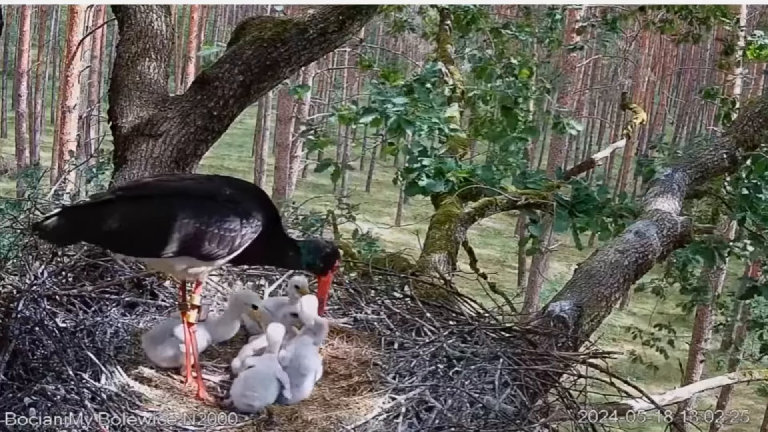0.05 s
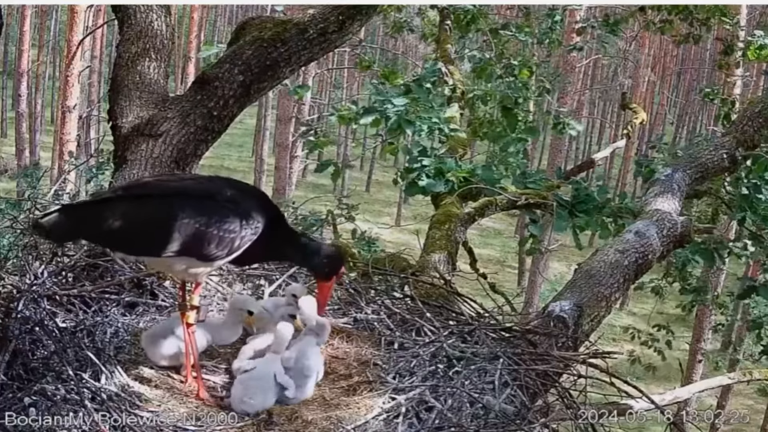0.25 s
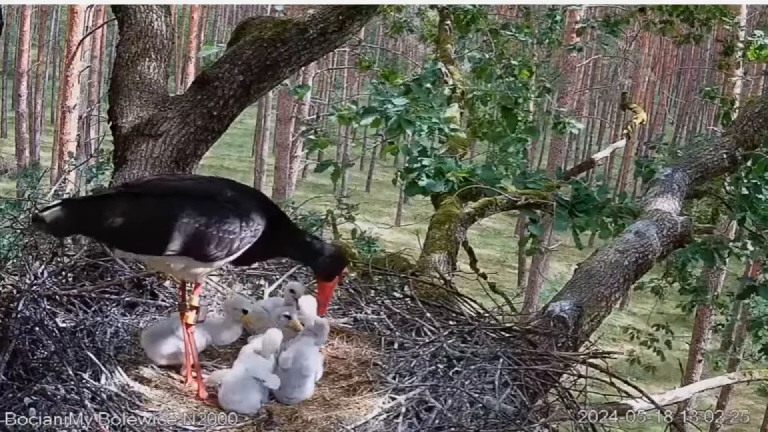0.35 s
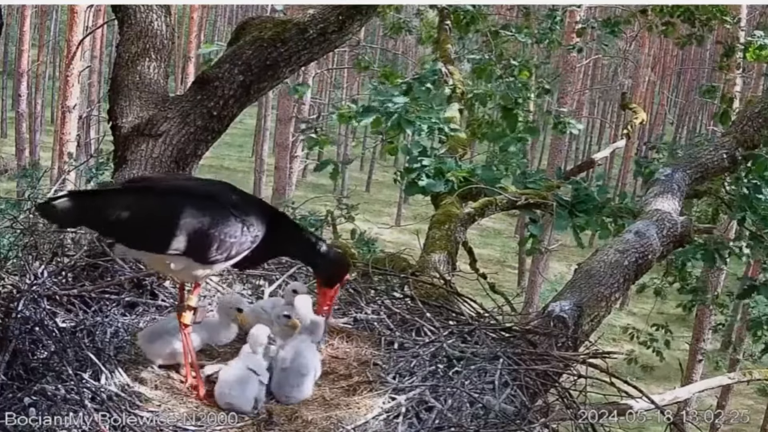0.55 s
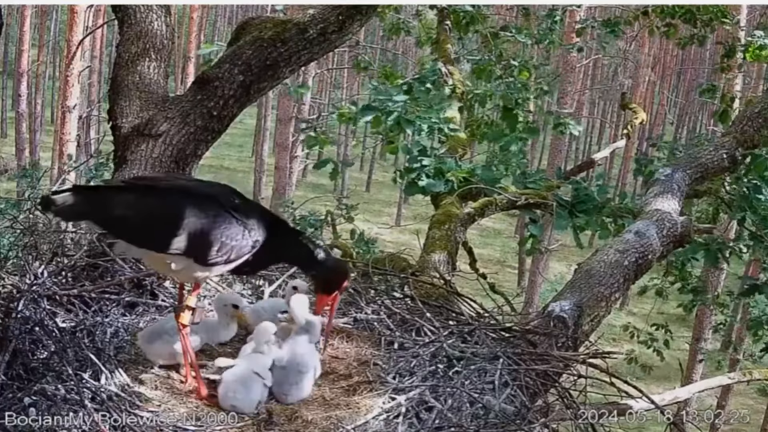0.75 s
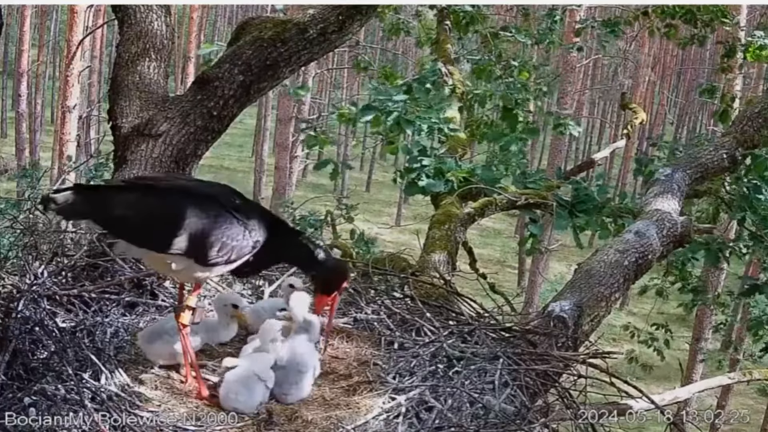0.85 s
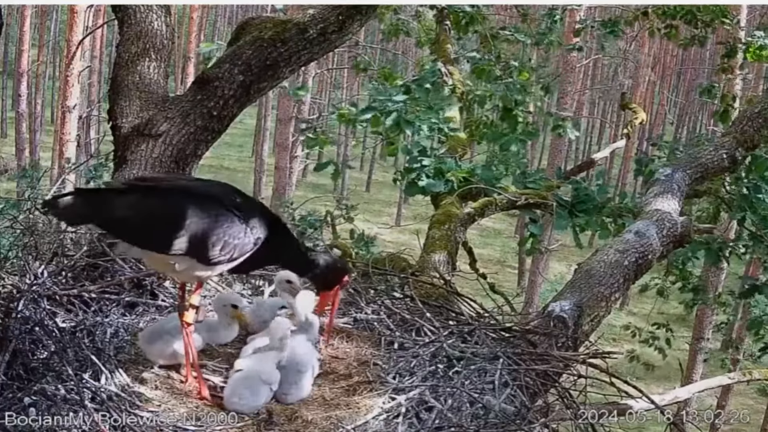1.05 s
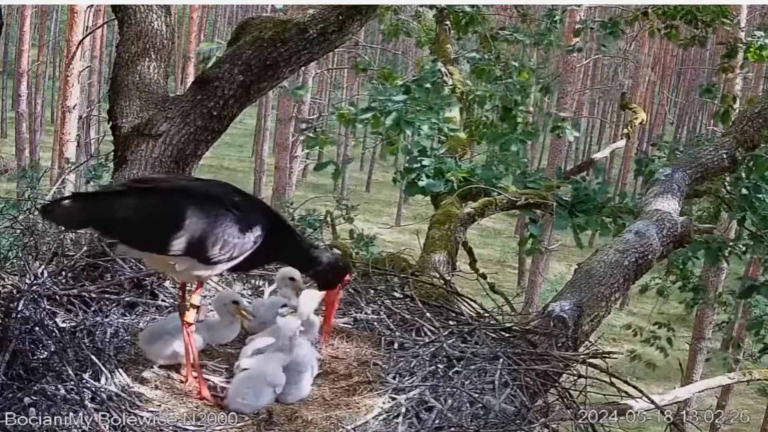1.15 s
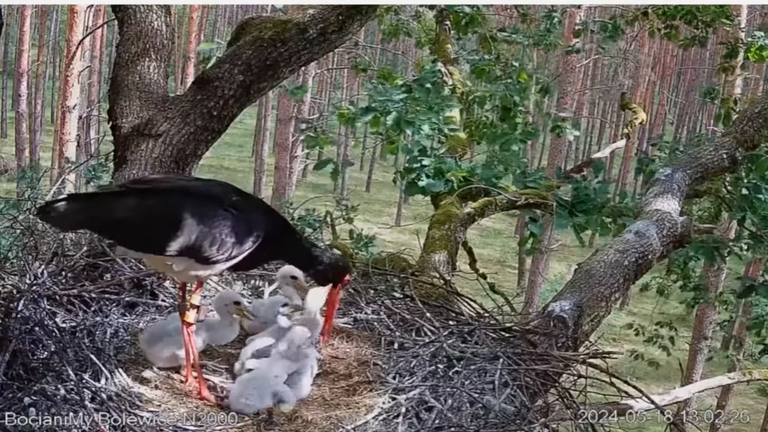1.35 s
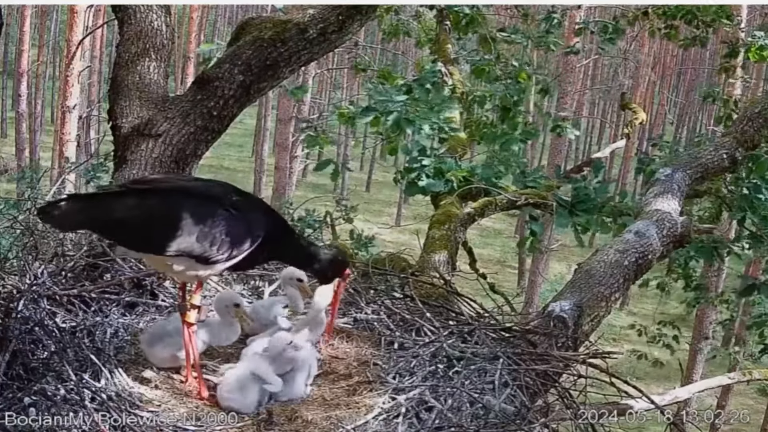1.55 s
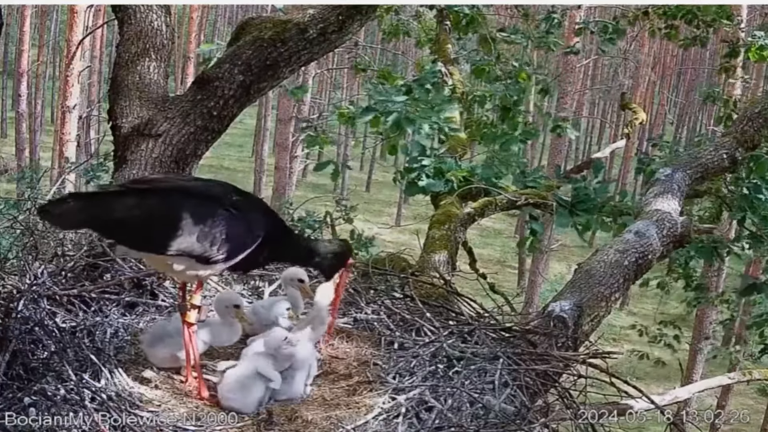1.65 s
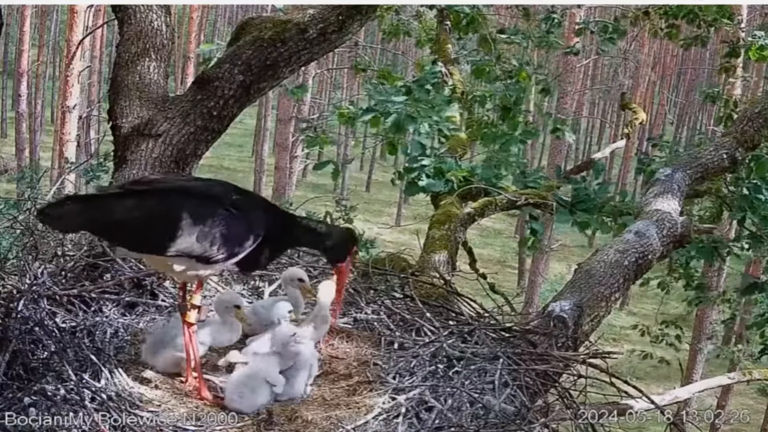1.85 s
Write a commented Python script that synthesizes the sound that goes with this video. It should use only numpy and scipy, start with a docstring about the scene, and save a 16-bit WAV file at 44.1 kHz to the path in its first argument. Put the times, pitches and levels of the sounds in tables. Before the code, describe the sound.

Stork chicks beg in a treetop forest nest, flipping between pulsing croaks, high arching whistles and hoarse rasps. After a short lull they call again, while low buffeting swells on the microphone. Twigs rustle faintly and bills tap.

```python
"""A treetop nest in a forest: stork chicks beg in two bouts. Their voices flip between a low, pulsing
croak and a high arching whistle, both fluttered by the syrinx, with hoarse rasps between. The open bill
colours the overtones. Twigs rustle, bills tap, and a short throat creak ends the scene.
Low buffeting swells under the second bout, and the forest gives a faint tail."""
import sys
import numpy as np
from scipy import signal
from scipy.fft import rfft, irfft, next_fast_len
from scipy.io import wavfile
from scipy.ndimage import uniform_filter1d

SR = 44100
rng = np.random.default_rng(int(sys.argv[2]) if len(sys.argv) > 2 else 0)


def put_to_file(sound):
    """Save the sound as 16-bit audio at rate SR, in the file named by the first command-line argument."""
    columns = np.atleast_2d(sound).T  # one column per channel
    safe = np.clip(columns, -1, 1)
    whole_steps = np.round(safe * 32767)
    wavfile.write(sys.argv[1], SR, whole_steps.astype(np.int16))


N = 83790
T = np.arange(N) / SR
WHISTLE_PULSE_HZ, CROAK_PULSE_HZ, BUZZ_HZ = 170, 107.9, 397
# throat passband: freq_hz, gain_db
THROAT_BAND = [(600, -16.5), (920, -18.5), (1150, -2), (3500, -1), (3850, -4), (4200, -14), (6000, -29)]


def amp(db):
    """Decibels to gain."""
    return 10 ** (np.asarray(db) / 20)


def unit(x):
    """Scale to rms 1."""
    return x / np.sqrt(np.mean(x ** 2) + 1e-20)


def colour(x, points):
    """Filter by a curve of freq_hz, gain_db."""
    hz, db = np.transpose(points)
    size = next_fast_len(N + 4096)
    bin_hz = np.maximum(np.arange(size // 2 + 1) * SR / size, 1)
    gain_db = np.interp(np.log(bin_hz), np.log(np.maximum(hz, 1)), db)
    return irfft(rfft(x, size) * amp(gain_db), size)[:N]


def noise(points):
    """Coloured noise, rms 1."""
    return unit(colour(rng.standard_normal(N), points))


def drift(rate_hz):
    """Smooth random wander, rms 1."""
    return unit(signal.sosfilt(signal.butter(2, rate_hz, fs=SR, output="sos"), rng.standard_normal(N)))


def curve(rows):
    """Straight lines through rows of time_s, value."""
    time_s, value = np.transpose(sorted(map(tuple, rows)))
    return np.interp(T, time_s, value)


def envelope(rows, edge_s=.002):
    """Gain from rows of time_s, level_db, fading outside their span."""
    outside_s = np.maximum(0, np.maximum(rows[0][0] - T, T - rows[-1][0]))
    return amp(curve(rows)) * np.exp(-np.minimum(outside_s / edge_s, 10) ** 2)


def burst(centre_s, half_s, db):
    """Bell-shaped swell of gain."""
    return amp(db) * np.exp(-np.minimum(abs(T - centre_s) / half_s, 10) ** 2)


def ring(start_s, hz, db, t60_s, rise_s):
    """Damped mode with a soft start."""
    age_s = np.maximum(T - start_s, 0)
    decay = amp(db - np.minimum(60 * age_s / t60_s, 200))
    return decay * (1 - np.exp(-age_s / rise_s)) * np.sin(2 * np.pi * hz * age_s)


def roughen(x, depth_rad, rate_hz):
    """Random phase shake that frays pure tones."""
    return np.real(signal.hilbert(x) * np.exp(1j * depth_rad * drift(rate_hz)))


def pulsing(hz, depth, uneven=.3):
    """Uneven syrinx flutter, as a gain of rms 1."""
    cycles = np.cumsum(hz * (1 + uneven * drift(90))) / SR + rng.random()
    return unit(np.exp(depth * (np.sin(2 * np.pi * cycles) + .3 * drift(200))))


def forest_air():
    """Faint steady noise."""
    # freq_hz, gain_db
    spectrum = [(180, -25.5), (300, 2.5), (355, -2.5), (659, -20.5), (937, -20.5), (1060, -22),
                (1280, -22.5), (3720, -31), (5750, -30), (6520, -33), (8640, -38.5), (11200, -72.5),
                (19000, -120)]
    return amp(-82.5) * noise([(20, -31)] + list(spectrum))


def reflections(x, t60_s):
    """Diffuse tail, different on each side."""
    tail = rng.standard_normal((2, N)) * amp(-60 * T / t60_s) * (T > .002)
    tail /= np.sqrt(np.sum(tail ** 2, axis=1, keepdims=True))
    return signal.fftconvolve(x[None], tail, axes=1)[:, :N]


def buffeting():
    """Lumpy low rumble with a few thumps, mono."""
    # rumble: time_s, level_db
    levels = [(0.0, -73), (0.088, -80), (0.12, -62.5), (0.3, -77.5), (0.438, -58.5), (0.602, -79),
              (0.724, -55.5), (0.792, -80.5), (0.84, -59.5), (0.956, -48), (1.032, -65), (1.136, -46.5),
              (1.19, -50.5), (1.21, -37), (1.232, -49.5), (1.28, -39), (1.316, -37.5), (1.332, -59.5),
              (1.354, -38), (1.402, -39), (1.476, -72.5), (1.518, -57), (1.586, -76.5), (1.75, -75.5),
              (1.862, -69), (1.9, -73)]
    # rumble: freq_hz, gain_db
    spectrum = [(12, -44.5), (20, -3.5), (80, -4.5), (171, -7.5), (222, -4), (276, -13), (337, -32),
                (393, -23.5), (675, -60), (800, -49), (1040, -80.5), (1760, -120)]
    # centre_s, level_db, pitch_hz
    thump_rows = [(1.2815, -26.5, 134), (1.304, -26, 144), (1.3557, -33, 135)]
    rumble = noise(spectrum)
    rumble /= np.sqrt(uniform_filter1d(rumble ** 2, size=1800))  # flatten the level
    thumps = sum(burst(s, half_s=.00476, db=db) * np.cos(2 * np.pi * hz * (T - s))
                 for s, db, hz in thump_rows)
    return rumble * amp(curve(levels) - 4) + thumps


def twig_rustle(grain_db=4.5):
    """Twigs shift under the birds, with a few bright scratches."""
    # rustle: time_s, level_db
    levels = [(0, -78), (.48, -76), (.58, -77.5), (.66, -80.5), (.73, -76.5), (.8, -88), (.83, -71.5),
              (1.26, -68), (1.5, -72), (1.58, -92), (1.77, -100.5), (1.81, -83.5), (1.9, -79.5)]
    # rustle: freq_hz, gain_db
    spectrum = [(500, -18), (950, -19.5), (1250, -1), (2600, -1), (3250, -2.5), (3700, -29), (8000, -40),
                (12000, -45)]
    # centre_s, half_length_s, level_db
    scratch_rows = [(0.308, 0.00043, -49.5), (1.2213, 0.0012, -46.5), (1.222, 0.026, -60.5)]
    # freq_hz, gain_db
    scratch_spectrum = [(4500, -26.5), (6000, -18), (7700, 10), (8500, -14), (10500, -9.5), (12500, -12.5)]
    scratches = sum(burst(*row) for row in scratch_rows) * noise(scratch_spectrum)
    grains = unit(noise(spectrum) * amp(grain_db * drift(150)))
    return amp(curve(levels)) * grains + scratches


def bill_taps():
    """Bill taps and sharp call accents, each one short ring."""
    # start_s, pitch_hz, level_db, t60_s
    taps = [(.0735, 1630, -36.5, 0.033), (0.2139, 2760, -28, 0.022), (1.0131, 1600, -31.5, 0.01),
            (1.0532, 1650, -31, 0.028), (1.8579, 1398, -39.5, 0.022), (1.872, 3190, -58, 0.051)]
    return colour(sum(ring(*row, rise_s=.0004) for row in taps), THROAT_BAND)


def throat_creak(start_s=1.7965, first_gap_s=.0066, slowing=1.17, rise_s=.0016):
    """Six slowing pulses ring the throat, shifting from its upper modes to the lower."""
    # pitch_hz, level_db, t60_s, change_per_pulse_db
    modes = [(3172, -44.5, 0.019, -0.8), (3220, -50.5, 0.06, -5), (1004, -57.5, 0.059, 2.4),
             (415, -71, 0.026, 3.5)]
    # freq_hz, gain_db
    spectrum = [(500, 3.5), (680, 1.5), (900, 0.5), (1400, -5.5), (2000, -27), (2800, 7.5), (3500, -5),
                (4200, -29)]
    pulses_s = start_s + first_gap_s * np.r_[0, np.cumsum(slowing ** np.arange(5))]
    rings = sum(ring(s - rise_s, hz * (1 + .035 * rng.normal()), db + k * change_db, t60_s, rise_s)
                for k, s in enumerate(pulses_s) for hz, db, t60_s, change_db in modes)
    return colour(roughen(rings, depth_rad=.45, rate_hz=120), spectrum)


def bill_treble(overtones, hiss_db=-4.5, spread_db=-4):
    """Ragged overtones and pulsed stereo hiss, coloured by the open bill."""
    # per phrase: time_s, level_db
    levels = [
        [(0.08, -91), (0.134, -71.5), (0.144, -83.5), (0.188, -70.5), (0.194, -72), (0.212, -73),
         (0.226, -56.5), (0.236, -49), (0.25, -70.5)],
        [(0.254, -70), (0.288, -45), (0.312, -63.5), (0.338, -42), (0.368, -51.5), (0.378, -45), (0.424, -64),
         (0.438, -49.5), (0.454, -48.5), (0.498, -83.5), (0.512, -66.5), (0.53, -79)],
        [(1.0, -87), (1.008, -64.5), (1.042, -46.5), (1.066, -44), (1.102, -61), (1.142, -43), (1.154, -68),
         (1.19, -50.5), (1.2, -62), (1.24, -50), (1.26, -72.5), (1.29, -57)],
        [(1.293, -61.5), (1.317, -66), (1.343, -57), (1.379, -78), (1.387, -71), (1.405, -82.5), (1.429, -67),
         (1.439, -56), (1.457, -67.5), (1.503, -67), (1.55, -96)],
    ]
    # per phrase: freq_hz, gain_db
    bill_spectra = [
        [(2530, -54), (4300, -25), (4820, -9), (5830, -31.5), (6550, -4), (6940, 8), (7850, 4.5), (8010, -17),
         (8150, -39.5), (8640, -14.5), (11200, -51), (19000, -120)],
        [(2470, -53), (4200, -20), (4390, -25.5), (4670, -0.5), (5190, -4.5), (6000, -7.5), (6410, -10.5),
         (6830, -2), (7250, -2), (7840, -6), (8640, -28), (11200, -43), (19000, -120)],
        [(2530, -70), (4300, -35), (4830, -46.5), (5000, -22.5), (6140, -17), (6470, -7.5), (6920, 2),
         (7710, -4.5), (8030, -25.5), (8250, -33.5), (8640, -25.5), (11200, -38.5), (19000, -120)],
        [(2530, -58), (4300, -27.5), (4750, -24.5), (5420, 4), (6320, -10.5), (7640, 0.5), (8130, -33),
         (8270, -41), (8640, -50), (11200, -83), (19000, -120)],
    ]
    ragged = roughen(overtones, depth_rad=.45, rate_hz=250)
    flutter = pulsing(WHISTLE_PULSE_HZ, depth=.14)
    sides = np.array([[1], [-1]])
    treble = 0
    for level, spectrum in zip(levels, bill_spectra):
        band = [(3800, -45)] + [(hz, db) for hz, db in spectrum if hz > 4000]
        tone = colour(ragged, band)
        tone /= np.sqrt(np.abs(uniform_filter1d(tone ** 2, size=400)) + 1e-10)  # flatten the level
        hiss = amp(hiss_db) * flutter * (noise(band) + amp(spread_db) * noise(band) * sides)
        treble += (tone + hiss) * envelope(level)
    return treble / np.hypot(1, amp(hiss_db)) * amp(-2.5)


def rasps(hoarse, flutter):
    """Toneless bursts of pulsed throat noise."""
    # centre_s, half_length_s, level_db
    swells = [(0.216, 0.013, -45), (0.512, 0.0084, -56.5), (0.633, 0.0078, -59), (0.777, 0.0062, -67),
              (1.126, 0.01, -40), (1.161, 0.016, -60), (1.211, 0.009, -48.5), (1.291, 0.0047, -59),
              (1.537, 0.011, -64), (1.859, 0.013, -63)]
    return sum(burst(*row) for row in swells) * hoarse * flutter


def croaks(hoarse, flutter):
    """Low pulsing glides; returns body, overtones."""
    # start_hz, end_hz, octave_db, hoarse_db
    calls = [(1407, 1900, -15.5, 8.5), (1330, 1180, -31, -36), (1620, 1610, -2.5, -25.5),
             (1580, 1470, -9.5, -12.5), (1704, 1420, -8, -19), (1480, 1700, -6, -7),
             (1450, 1450, -5, -17.5), (1530, 1620, -2, -28.5), (1590, 1600, 3.5, -9.5),
             (1545, 1420, -9, -17.5), (1177, 1200, -16.5, -16), (1438, 1500, -4.5, -4.5),
             (1205, 1520, -7, -1.5), (1620, 530, 11, -1.5)]
    # per croak: time_s, level_db
    levels = [
        [(0.0, -54), (0.016, -66.5), (0.024, -74), (0.034, -64), (0.04, -61.5)],
        [(0.046, -77), (0.054, -49), (0.068, -67)],
        [(0.07, -69), (0.076, -43), (0.094, -61), (0.104, -34.5), (0.111, -65.5)],
        [(0.172, -64), (0.176, -44.5), (0.212, -39.5), (0.222, -50)],
        [(0.279, -43.5), (0.287, -42), (0.293, -29), (0.307, -50.5), (0.317, -47), (0.325, -39.5),
         (0.331, -45.5)],
        [(0.388, -56), (0.396, -37), (0.418, -51.5), (0.43, -34.5), (0.435, -57.5)],
        [(0.468, -65.5), (0.474, -46), (0.486, -49), (0.495, -78.5)],
        [(0.878, -68.5), (0.886, -56), (0.9, -61.5), (0.916, -41.5), (0.922, -43.5), (0.928, -64)],
        [(0.978, -60.5), (0.982, -43.5), (1.004, -54.5), (1.014, -40.5), (1.024, -54)],
        [(1.049, -46.5), (1.055, -36), (1.085, -41), (1.097, -45.5), (1.109, -52), (1.118, -40.5)],
        [(1.166, -68), (1.174, -38.5), (1.194, -54), (1.205, -45)],
        [(1.285, -71.5), (1.311, -45), (1.319, -42.5), (1.335, -83)],
        [(1.397, -63.5), (1.429, -56), (1.445, -57)],
        [(1.483, -65), (1.493, -85.5), (1.515, -77.5)],
    ]
    body, overtones = np.zeros((2, N))
    waver = 1 + .03 * drift(450)
    for (start_hz, end_hz, octave_db, hoarse_db), level in zip(calls, levels):
        pitch_hz = curve([(level[0][0], start_hz), (level[-1][0], end_hz)])
        phase = 2 * np.pi * np.cumsum(pitch_hz * waver) / SR
        gain = envelope(level) * flutter * amp(.5)
        body += gain * (np.sin(phase) + amp(octave_db) * np.sin(2 * phase) + amp(hoarse_db) * hoarse)
        overtones += gain * amp(-29) * sum(np.sin(k * phase) for k in range(3, 6))
    return body, overtones


def whistles(hoarse):
    """High arching tones with a noisy halo; returns body, overtones."""
    # per whistle: time_s, pitch_hz
    pitches = [
        [(.015, 1874), (.022, 2720), (.063, 2824), (.07, 1990)],
        [(.108, 2640), (.119, 2800), (.131, 3600)],
        [(.15, 3600), (.161, 3120), (.174, 2450)],
        [(.21, 2750), (.219, 2794), (.227, 3365), (.233, 3860), (.245, 3860)],
        [(.25, 3600), (.267, 3450), (.276, 2650), (.284, 2050)],
        [(.327, 1826), (.333, 2788), (.342, 2557), (.351, 3030), (.359, 3330), (.37, 2668), (.383, 2630),
         (.391, 1830)],
        [(.431, 2200), (.436, 2791), (.446, 2508), (.451, 2725), (.458, 2094), (.465, 2243), (.471, 1700)],
        [(.83, 2157), (.845, 2490), (.88, 2615)],
        [(.923, 2500), (.931, 2745), (.944, 2800), (.957, 3014), (.971, 2930), (.982, 1710)],
        [(1.019, 2628), (1.029, 2700), (1.04, 3337), (1.054, 3470), (1.075, 3376), (1.105, 3044)],
        [(1.215, 2900), (1.235, 3012), (1.25, 3775), (1.27, 3700), (1.288, 2514)],
        [(1.316, 2870), (1.329, 2708), (1.352, 3900), (1.367, 3100), (1.395, 1980)],
        [(1.431, 2650), (1.441, 2720), (1.458, 3700), (1.468, 3020), (1.482, 1887)],
    ]
    # per whistle: time_s, level_db
    levels = [
        [(0.016, -51), (0.024, -43), (0.038, -55), (0.062, -42.5), (0.07, -65)],
        [(0.108, -38.5), (0.126, -44), (0.133, -73.5)],
        [(0.15, -72), (0.158, -47.5), (0.174, -48)],
        [(0.21, -46), (0.216, -29.5), (0.228, -35.5), (0.245, -59)],
        [(0.25, -61), (0.26, -45.5), (0.283, -35)],
        [(0.328, -27), (0.336, -25.5), (0.346, -29.5), (0.372, -34), (0.382, -19.5), (0.39, -34.5)],
        [(0.432, -27.5), (0.438, -15.5), (0.45, -34), (0.462, -22.5), (0.47, -44.5)],
        [(0.83, -51.5), (0.834, -66), (0.858, -45.5), (0.88, -60.5)],
        [(0.924, -54), (0.932, -32), (0.942, -37.5), (0.98, -42.5)],
        [(1.019, -40), (1.037, -31.5), (1.045, -48.5), (1.075, -42), (1.087, -51.5), (1.099, -36),
         (1.105, -62.5)],
        [(1.217, -62), (1.239, -52), (1.257, -74), (1.273, -71.5), (1.288, -62.5)],
        [(1.318, -63.5), (1.328, -42), (1.352, -70), (1.388, -55.5), (1.395, -68.5)],
        [(1.432, -55), (1.438, -42), (1.458, -67.5), (1.482, -60)],
    ]
    # per whistle: 0 clear to 1 broken
    roughness = [.35, .35, .35, .5, .5, .35, .25, .2, .22, .45, .9, .9, .8]
    body, overtones = np.zeros((2, N))
    flutter = pulsing(WHISTLE_PULSE_HZ, depth=.4) * pulsing(BUZZ_HZ, depth=.31)
    waver = .062 * drift(450)
    fray_rad = 1.7 * drift(130)
    for pitch, level, rough in zip(pitches, levels, roughness):
        phase = 2 * np.pi * np.cumsum(curve(pitch) * (1 + rough * waver)) / SR
        gain = envelope(level) * unit(flutter ** (2 * min(rough, .5))) * amp(-2)
        halo = amp(-3) * np.sin(phase + fray_rad) + amp(-17) * hoarse
        body += gain * (np.sin(phase) + rough * halo)
        steadier_phase = 2 * np.pi * np.cumsum(curve(pitch) * (1 + .6 * rough * waver)) / SR
        overtones += gain * (np.sin(2 * steadier_phase) + amp(-7.5) * np.sin(3 * steadier_phase))
    return body, overtones


def voices():
    """Begging calls; returns the throat-filtered body and the raw overtones."""
    # hoarse noise: freq_hz, gain_db
    throat_spectrum = [(700, -42), (1000, -21), (1250, -1.5), (1550, 15.5), (1850, 0.5), (2150, 1.5),
                       (2400, -2.5), (2700, 10), (3250, 11), (3600, -24), (4300, -34.5)]
    hoarse = noise(throat_spectrum) * pulsing(BUZZ_HZ, depth=.18)
    whistle, whistle_overtones = whistles(hoarse)
    flutter = pulsing(CROAK_PULSE_HZ, depth=.52, uneven=.55)
    croak, croak_overtones = croaks(hoarse, flutter)
    body = colour(whistle + croak + rasps(hoarse, flutter), THROAT_BAND)
    return body, whistle_overtones + croak_overtones


def scene():
    """Chicks panned by frequency, with reflections, buffeting and forest air."""
    # freq_hz, left_minus_right_db
    pan = [(900, -2.5), (1400, 3), (2100, -1.5), (3300, -3), (5200, 0), (7000, 0.5), (8500, -3.5)]
    body, overtones = voices()
    chicks = body + throat_creak() + bill_taps() + twig_rustle() + bill_treble(overtones)
    placed = np.array([colour(side, [(hz, sign * db / 2) for hz, db in pan])
                       for side, sign in zip(chicks, (1, -1))])
    mid = chicks.mean(axis=0)
    nest_tail = amp(-14.5) * reflections(mid, t60_s=.09)
    forest_tail = amp(-31.5) * reflections(mid, t60_s=.13)
    return placed + nest_tail + forest_tail + buffeting() + forest_air()


def record(dry):
    """Steep low-pass."""
    stop_hz = 12200
    return signal.sosfilt(signal.cheby2(12, 60, stop_hz, fs=SR, output="sos"), dry)


dry = scene()
out = record(dry)
put_to_file(out)
```